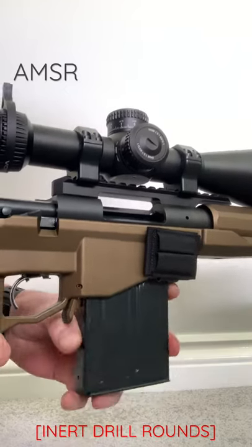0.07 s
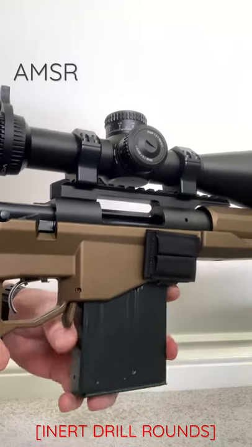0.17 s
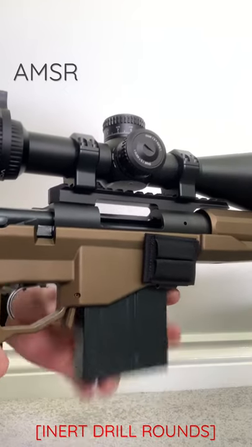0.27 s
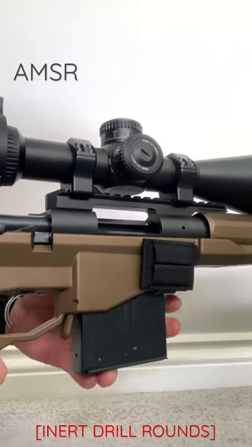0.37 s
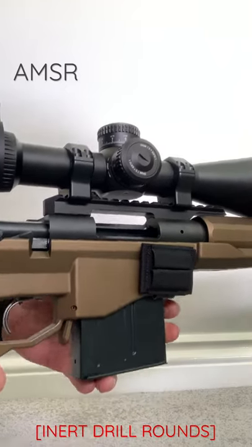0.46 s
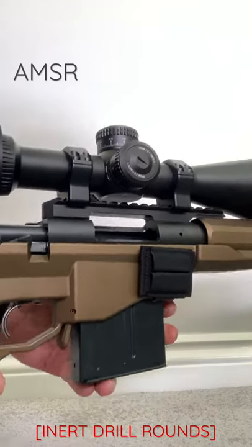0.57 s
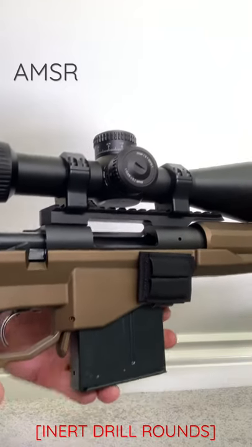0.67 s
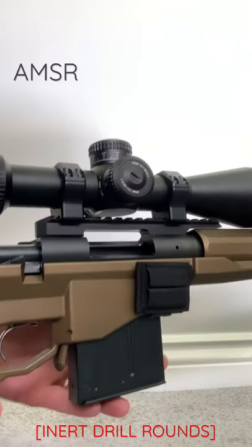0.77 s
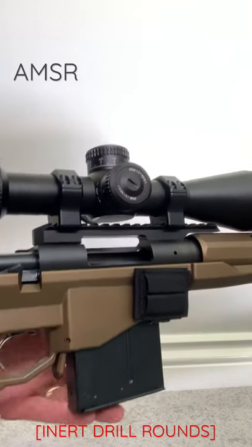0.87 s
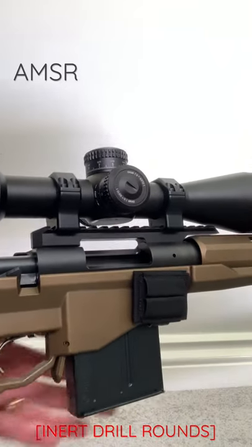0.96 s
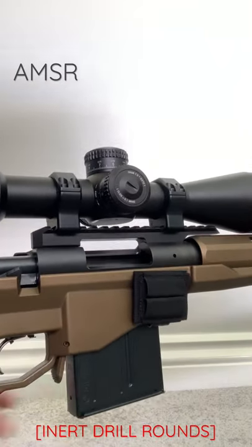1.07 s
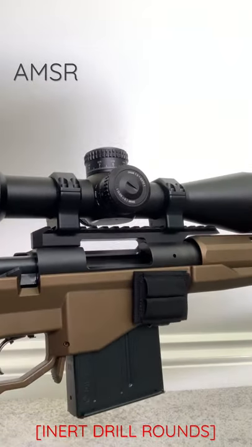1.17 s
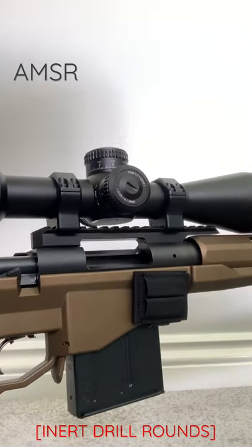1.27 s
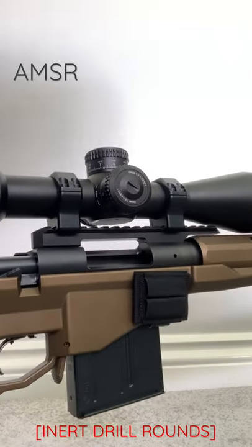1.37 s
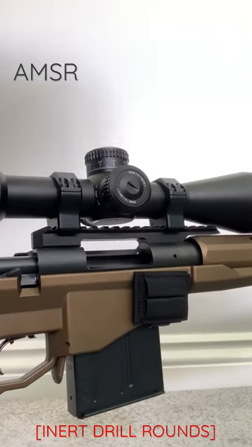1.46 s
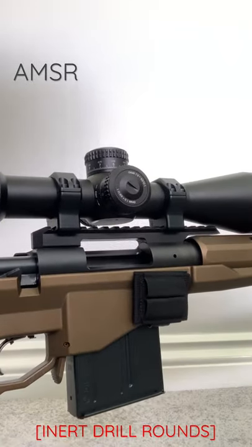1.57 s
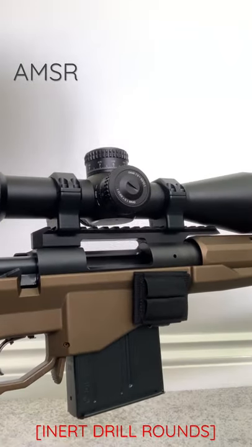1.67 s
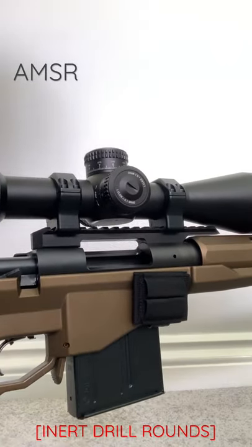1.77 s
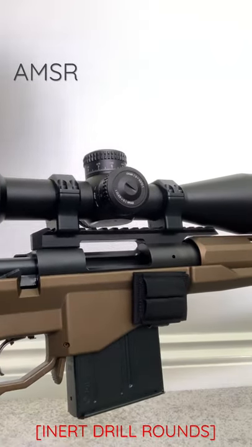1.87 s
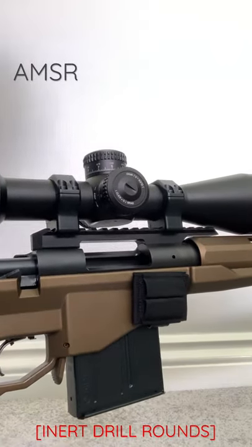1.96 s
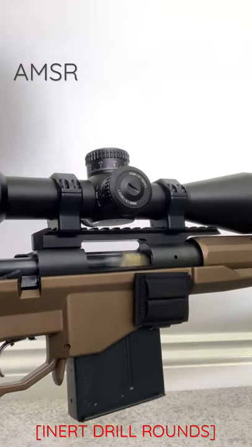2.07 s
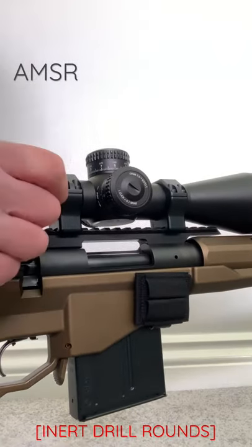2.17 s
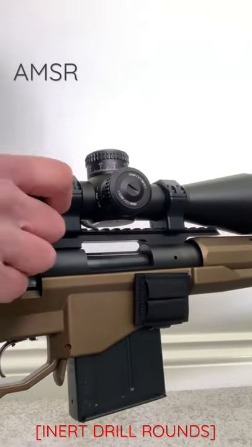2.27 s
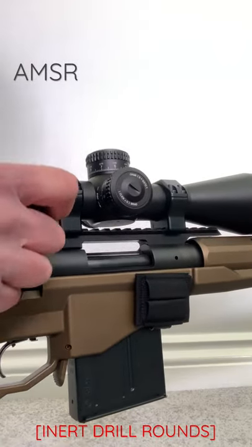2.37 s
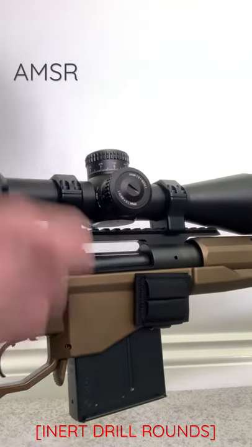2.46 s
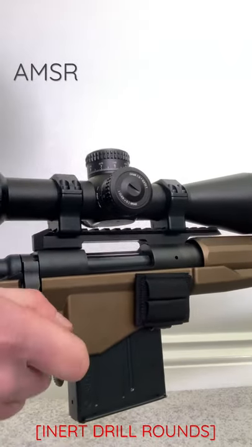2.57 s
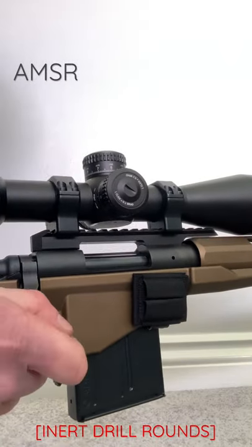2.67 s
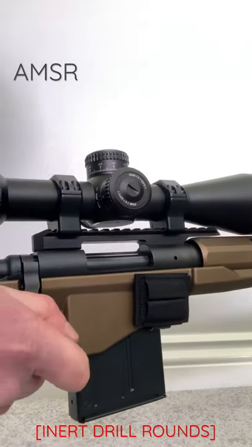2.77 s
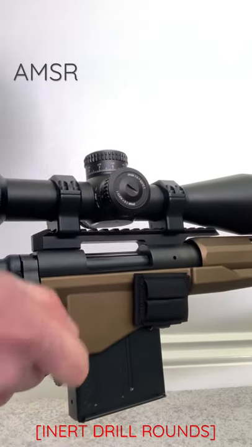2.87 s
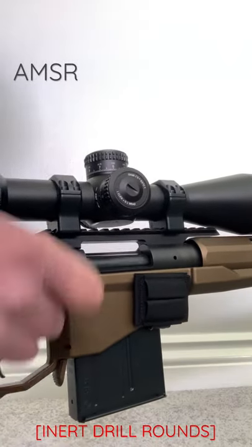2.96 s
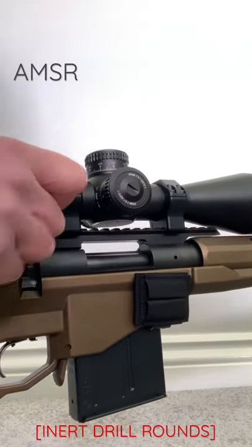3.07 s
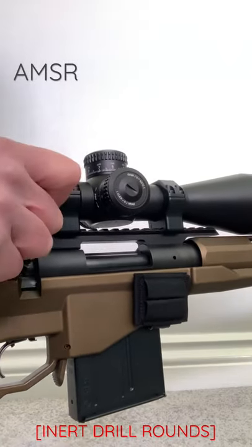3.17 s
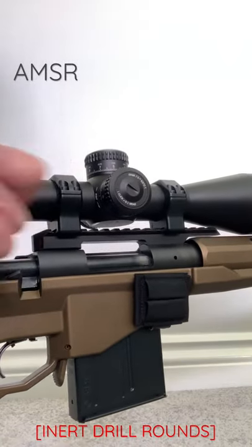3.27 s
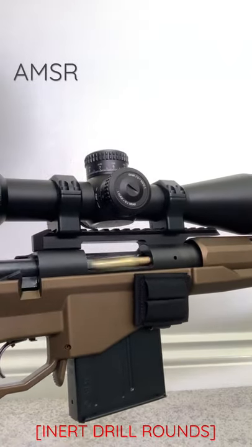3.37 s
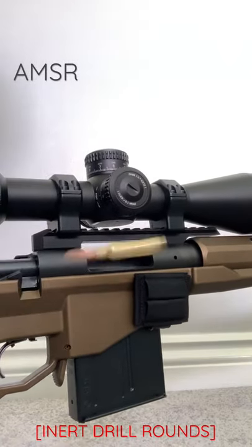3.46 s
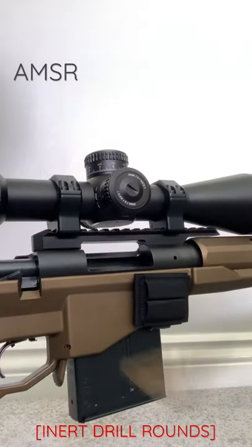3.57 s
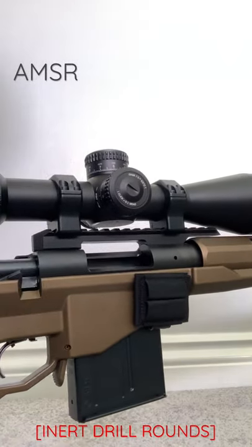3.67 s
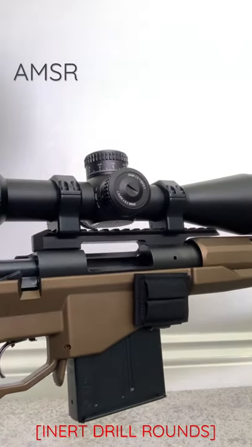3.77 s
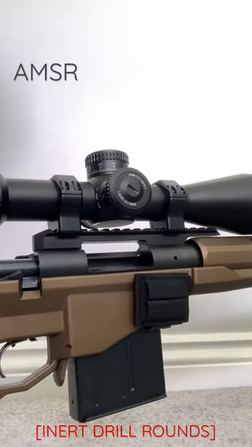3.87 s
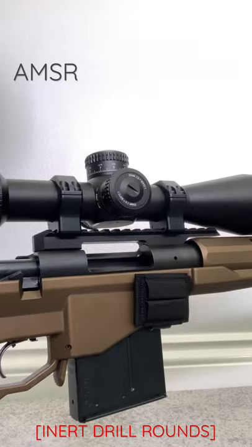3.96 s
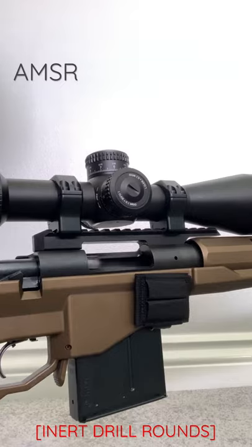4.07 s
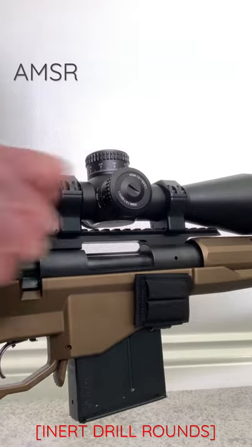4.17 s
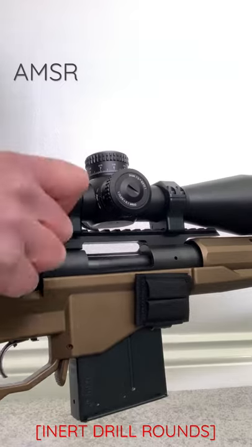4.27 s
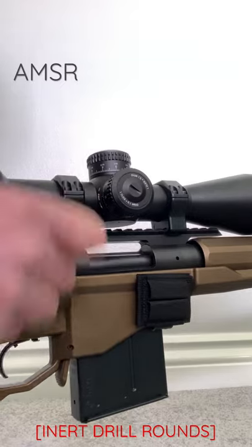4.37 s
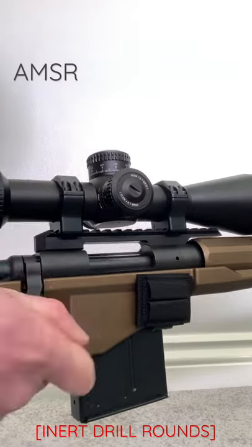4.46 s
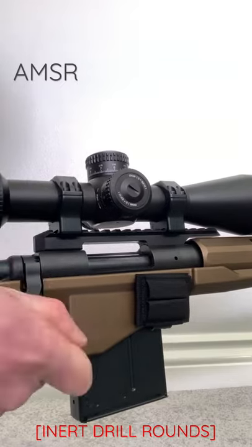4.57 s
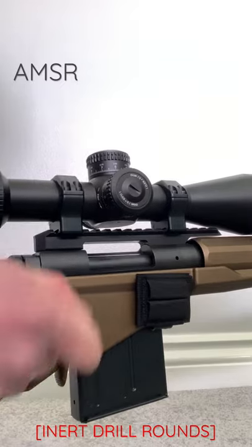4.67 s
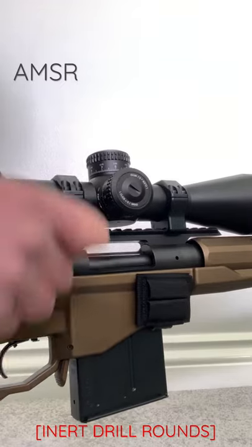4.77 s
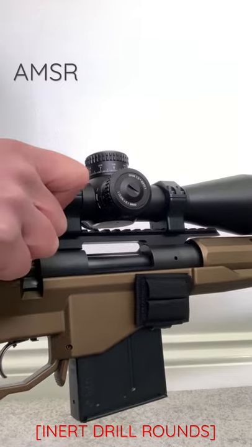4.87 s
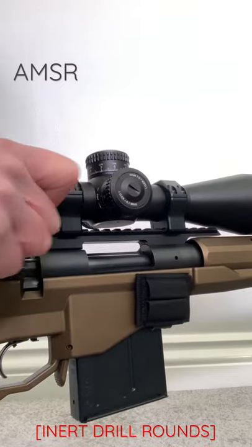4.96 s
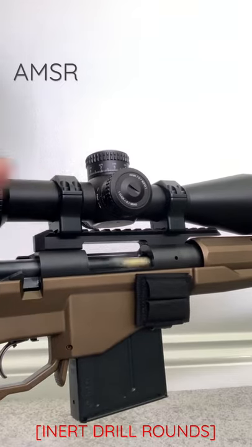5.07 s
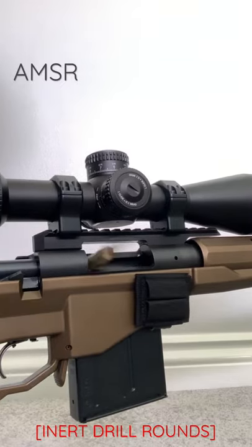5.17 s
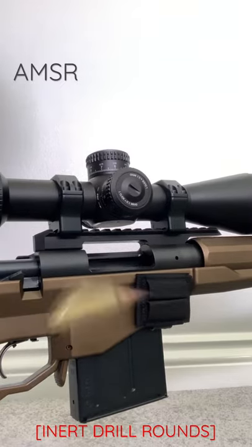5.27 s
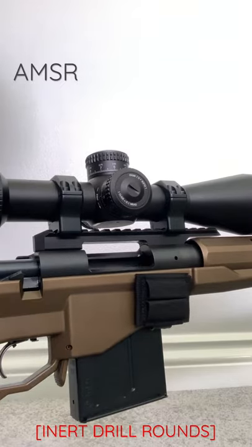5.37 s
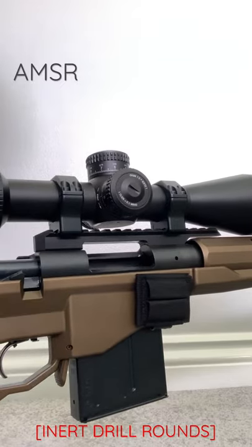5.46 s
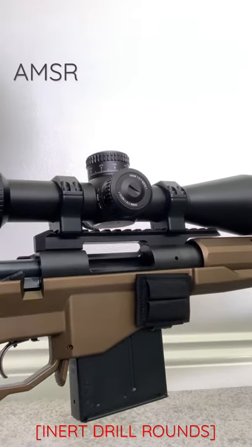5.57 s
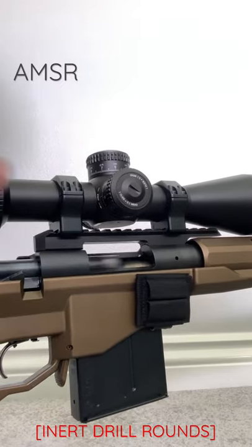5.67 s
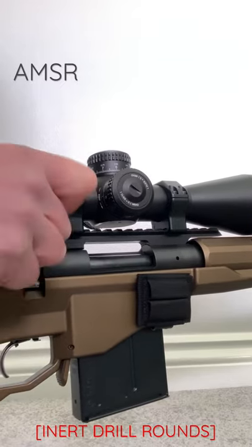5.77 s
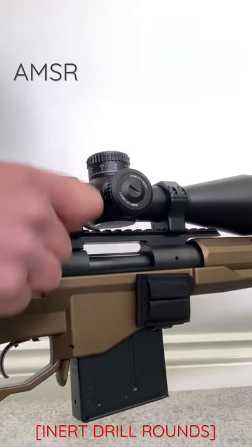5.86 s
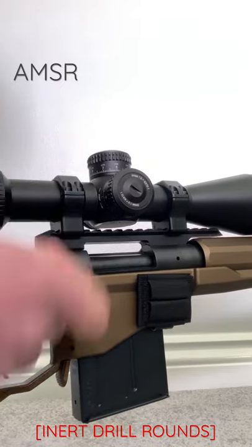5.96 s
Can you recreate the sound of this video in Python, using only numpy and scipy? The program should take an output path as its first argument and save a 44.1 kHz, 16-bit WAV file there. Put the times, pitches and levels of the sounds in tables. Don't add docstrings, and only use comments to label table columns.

```python
import sys
import numpy as np
from scipy import signal
from scipy.fft import rfft, irfft, next_fast_len
from scipy.io import wavfile
from scipy.ndimage import uniform_filter1d, minimum_filter1d

SR = 44100
rng = np.random.default_rng(int(sys.argv[2]) if len(sys.argv) > 2 else 0)


def inscribe(sig):
    pcm = np.round(np.clip(np.atleast_2d(sig).T, -1, 1) * 32767)
    wavfile.write(sys.argv[1], SR, pcm.astype(np.int16))


def volts_from_decibels(level):
    exponent = np.asarray(level, float) / 20
    return 10 ** exponent


N = 265923
LEAD_IN_MS = 15

# pitch_hz [Hz], t60_s [s to fall 60 dB]
ROOM_T60 = [(100, 0.42), (400, 0.25), (1200, 0.16), (2100, 0.54), (3200, 0.3), (5000, 0.28), (8000, 0.3),
            (11500, 0.23), (13500, 0.26), (15800, 0.24)]


def evened(x):
    return x / np.sqrt(np.mean(x ** 2) + 1e-20)


def read(points, hz):
    f, value = np.transpose(points)
    return np.interp(np.log(hz + 1), np.log(f + 1), value)


def add(mix, s, sound, peak_db):
    sound = sound[max(-round(s * SR), 0):]
    part = mix[max(round(s * SR), 0):][:len(sound)]
    part += volts_from_decibels(peak_db) * sound[:len(part)] / abs(sound).max()


def in_order(groups):
    return sorted((*row, shared) for rows, shared in groups for row in rows)


def coloured(x, gain):
    size = next_fast_len(N)
    return irfft(rfft(x, size) * gain(np.fft.rfftfreq(size, 1 / SR)), size)[..., :N]


def rings(modes, chance, seconds):
    hz, db, t60 = np.transpose(modes)[:, :, None]
    t = np.arange(round(seconds * SR)) / SR
    height, phase = chance[:, :len(hz), None]
    pitch = hz * (1 + .05 * (phase - .5))
    return volts_from_decibels(db + 8 * (height - .5) - 60 * t / t60) * np.sin(2 * np.pi * (pitch * t + phase))


def chatter(noise, ms, spiky):
    t = np.arange(len(noise)) / SR * 1000 - LEAD_IN_MS
    after = np.maximum(t, 0)
    blow = (1 - np.exp(-after / (0.6 * ms + 0.3))) * np.exp(-(after / max(ms, .3)) ** 1.9)
    swell = .008 * (ms + 1.5) * np.exp(-abs(t) / 4)
    return noise * abs(noise) ** spiky * (blow + swell)


def struck(hz, width_hz, seconds=.012):
    t = np.arange(round(seconds * SR)) / SR
    return np.sin(2 * np.pi * hz * t) * np.exp(-np.pi * width_hz * t)


def clicks():
    # pitch_hz [Hz], level_db [dB], t60_s [s]
    steel = [(1950, -4, .06), (3430, 0, .035), (13280, -4, .04)]
    # start_s [s], peak_db [dB], sizzle_db above 9.5 kHz [dB], chatter_ms [ms]
    handle = [(.2955,-10,-33,3.8),(.2992,-1.5,-23,2.4),(5.048,-36,-22,1.5),(1.8765,-60,-28,3.6),(2.0019,-20,-15.5,5.4),(2.3321,-40,-40,14.2),(2.9205,-34.5,-15,0.43),(3.4285,-9.5,-2,1.35),(3.6461,-51,0,3.9),(4.0028,-38.5,-17,10),(4.8285,-12,-14.5,2.3),(5.477,-38.5,-10,4.2),(5.8855,-39,-39,20)]
    bolt = [(.284,-28,-0.5,1.6),(.3035,-10,-14,2.24),(2.0555,-10,-16.5,3),(2.0695,-14.5,4.5,2.65),(2.074,-9.5,-25,8.2),(2.079,-17,2.5,4.4),(2.085,-23.5,-2,3.4),(2.4676,-15,-6.5,9.3),(2.4724,-14.5,-15.5,2.8),(2.5566,-33.5,-23,17),(3.025,-21.5,-10.5,1.9),(3.0425,-14.5,-21.5,4.6),(3.3231,-21,-21.5,11.4),(3.3775,-20,-17.5,6.1),(3.4215,-14,-15.5,5.2),(3.8694,-24.5,-22.5,6.2),(4.1178,-9,-11,2.9),(4.3671,-22,-4,2.6),(4.4712,-18,-11,6.8),(4.6563,-42.5,-16,1.4),(4.6787,-35,-51,7.2),(4.7965,-16.5,-24,1.8),(4.8012,-21.5,-25.5,2.3),(4.8185,-24.5,-12,3.6),(5.1642,-11.5,-4,2.7),(5.168,-17.5,6,2.3),(5.6685,-28,-27,3.8),(5.6828,-9,1.5,2.6),(5.69,-8,0,7.8),(5.6965,-27.5,-5,8.2),(5.7025,-11,-6.5,13.8)]
    lugs = [(.0054,-24.5,-5,3.1),(.0563,-33.5,-30,3.65),(1.782,-6.5,-12.5,2.04),(2.1612,-17,-2.5,3.8),(2.2313,-28,-30,3.1),(3.0676,-8.5,-5.5,5.7),(3.7941,-12.5,-16,2.07),(4.0995,-21,-26,3.4),(4.104,-12,-8,1.7),(4.109,-13,-29,0.98),(4.1245,-8.5,-5,3.9),(4.143,-26,-13,1.5),(4.823,-6,-3.5,1.5),(4.1983,-14,-14,1.6),(4.3447,-33.5,-39.5,4.4),(4.6971,-21,-32.5,0.82),(1.0095,-32,-21,1.5),(5.0635,-16,-14.5,2.4),(5.0765,-21,-23,2.6),(5.125,-18,-26,7.5),(5.1445,-12.5,-17.5,4.6),(5.157,-18,-8.5,4.4),(5.39,-50,-4,6.2),(5.4166,-15.5,-11.5,1.7),(5.6745,-11,-14,3.1)]
    claw = [(3.306,-11.5,-12.5,3.7),(3.368,-15.5,2.5,3.8),(3.376,-6,-9,0.64),(3.4145,-39,-5,2.3),(3.4335,-10,-2.5,1.6),(4.1215,-17.5,8.5,1.6),(4.8155,-30,-6.5,2.7),(5.1164,-17,7.5,0.56),(5.123,-17,-2,3.6),(4.3764,-18.5,-11.5,3.7),(5.7651,-14,-14,3.1),(5.9195,-21,-5,3.1)]
    blows = in_order([(handle, 2850), (bolt, 3450), (lugs, 4500), (claw, 7100)])
    out = np.zeros(N)
    noise = rng.standard_normal((len(blows), 2, 2000))
    chance = rng.random((len(blows), 2, 20))
    mid = signal.butter(2, [1800, 9500], "band", fs=SR)
    top = signal.butter(3, 9500, "high", fs=SR)
    t = np.arange(SR // 10) / SR
    blur = rng.standard_normal((len(blows), len(t))) * volts_from_decibels(-14 - 60 * t / 0.015)
    for (s, db, sizzle_db, ms, hz), (a, b), c, body in zip(blows, noise, chance, blur):
        s = s - .001 - LEAD_IN_MS / 1000
        body = body + volts_from_decibels(-33) * rings(steel, c, .1).sum(0)
        body[0] += 1.1
        part = body + 0.62 * struck(hz, 1100, .1)
        click = signal.fftconvolve(chatter(a, ms, 0.16), part)
        add(out, s, signal.lfilter(*mid, click), db + 0.5)
        tip = body + 0.1 * struck(10000, 900, .1)
        sizzle = signal.fftconvolve(chatter(b, ms, 1.0), tip)
        add(out, s, signal.lfilter(*top, sizzle), db + sizzle_db + 14.5)
    return out


def knocks():
    # pitch_hz [Hz], level_db [dB], t60_s [s]
    stock = [(535, -6.5, 0.073), (749, -2.5, 0.05), (870, 5.5, 0.0066), (1093, 6.5, 0.0077),
             (1296, 2, 0.052), (1530, -23, 0.022), (1644, -2, 0.026)]
    # start_s [s], peak_db [dB]
    butt = [(1.877,-28.5),(1.945,-43),(2.016,-14),(2.557,-28),(2.921,-30),(3.068,-11.5),(3.645,-37.5),(3.795,-26.5),(4.006,-25.5)]
    grip = [(.057,-36.5),(2.867,-36.5),(3.434,-6.5),(3.437,-36.5),(4.828,-17.5)]
    cheek = [(.181,-39.5),(4.366,-19),(4.679,-26.5),(5.682,-4.5),(5.688,-4.5),(5.694,-14.5),(5.702,-15),(5.765,-12)]
    forend = [(2.072,-11.5),(4.153,-48),(4.472,-13.5),(4.642,-34),(4.959,-45),(4.988,-41.5),(5.147,-9.5),(5.153,-15),(5.158,-13.5),(5.166,-8),(5.172,-11.5),(5.476,-24.5),(5.699,-7.5),(5.89,-28),(5.92,-37.5),(5.953,-38),(5.966,-40),(5.976,-36.5),(5.993,-37.5),(6.007,-43),(6.018,-36)]
    well = [(2.077,-5),(2.335,-36),(2.972,-33.5),(3.044,-18),(3.321,-18),(3.871,-22),(4.047,-30.5),(4.117,-5),(4.124,-5)]
    flank = [(2.162,-26.5),(2.47,-13.5),(3.025,-18.5),(3.369,-16),(4.099,-18),(4.2,-18.5),(4.406,-29.5),(4.425,-29),(4.698,-20.5),(4.796,-19.5),(5.061,-26.5),(5.075,-18.5),(5.117,-23),(5.13,-15),(5.138,-22),(3.235,-35.5),(3.262,-32.5),(3.283,-44),(3.395,-29.5),(5.6,-37),(5.625,-37.5),(5.417,-28.5),(5.583,-37),(5.652,-22.5)]
    rail = [(.005,-19.5),(.296,-12),(1.782,-23.5),(2.005,-14.5),(2.116,-54),(2.224,-44.5),(3.306,-20.5),(4.342,-28.5),(5.038,-32.5),(5.121,-19.5)]
    latch = [(1.01,-43),(1.033,-45),(1.062,-54),(1.41,-47),(1.435,-39.5),(1.63,-53),(1.085,-50),(1.115,-54.5),(2.008,-27),(2.03,-16),(2.056,-16)]
    blows = in_order([(butt, 530), (grip, 700), (cheek, 885), (forend, 1000),
                      (well, 1110), (flank, 1265), (rail, 1500), (latch, 1600)])
    out = np.zeros(N)
    noise = rng.standard_normal((len(blows), 2000))
    chance = rng.random((len(blows), 2, 20))
    for (s, db, hz), a, c in zip(blows, noise, chance):
        body = volts_from_decibels(-19) * rings(stock, c, 0.11).sum(0)
        panel = struck(hz, 125, .04)
        body[:len(panel)] += panel
        knock = signal.fftconvolve(chatter(a, 5.47, 0.18), body)
        add(out, s - .001 - LEAD_IN_MS / 1000, knock, db + 0.5)
    return out


def patchy(x):
    z = signal.stft(x, nperseg=256)[2]
    patches = uniform_filter1d(rng.standard_normal(z.shape), size=3, axis=0)
    patches = uniform_filter1d(patches, size=5, axis=1)
    swing_db = 5 * evened(patches)
    return evened(signal.istft(z * volts_from_decibels(swing_db), nperseg=256)[1][:N])


def slides():
    # peak_s [s], level_db [dB rms], rise_ms [ms], fade_ms [ms]
    rubs = [(.01,-40.5,12,39),(.32,-48,5.5,23),(.55,-60.5,280,34.5),(.75,-75,18,15.6),(.88,-61.5,51,70),(1.2,-80,42,29),(1.53,-82,8.6,34),(1.635,-61,14,12),(1.049,-47.5,23.2,26),(1.42,-55.5,23,20),(1.69,-66.5,176,66),(1.997,-36,8.9,69),(2.33,-59,11,48),(3.01,-54.5,43,27),(3.055,-31,7.4,28),(3.27,-42,23,40.5),(3.406,-26,19,19),(4.095,-36.5,21,8),(4.75,-50,11,32),(5.047,-36,15.5,19.8),(5.137,-28,10,15),(5.601,-57,17,62),(5.97,-51,490,19),(3.24,-50.5,27,22),(4.42,-46.5,26,31),(4.97,-52.5,15,30),(5.9,-46,8,14),(6.0,-52,29,18),(1.09,-70.5,18,27)]
    # peak_s [s], level_db [dB rms], rise_ms [ms], fade_ms [ms]
    glides = [(.19,-55.5,20,36),(.27,-31.5,11,31),(.294,-27.5,10,2.8),(1.3,-59,20,45),(2.11,-36,37,15),(2.89,-59,4.8,42),(3.34,-43.5,9.1,20),(3.89,-40,10,14),(4.04,-47,24,7.4),(4.15,-34,7.5,7.7),(4.39,-53.5,62,31),(4.81,-23.5,12,22),(4.98,-53,13,98),(5.666,-35,8,14),(5.73,-36,33,21)]
    # pitch_hz [Hz], level_db [dB]
    rub_dull = [(200, -4.5), (600, 2), (1100, 5), (1750, 6), (2300, -6), (4000, -18), (8000, -22),
                (13000, -24.5)]
    # pitch_hz [Hz], level_db [dB]
    rub_bright = [(200, -20.5), (600, -12.5), (1300, 2.5), (2200, 4.5), (4000, 8), (8000, -1.5), (13000, 6)]
    t, dull_level, bright_level = np.arange(N) / SR, np.zeros(N), np.zeros(N)
    for s, db, rise_ms, fade_ms, share in in_order([(rubs, 0.32), (glides, 0.46)]):
        near = slice(max(round((s - .25) * SR), 0), round((s + .35) * SR))
        ms = (t[near] - s) * 1000
        pace_ms = np.where(ms < 0, rise_ms, fade_ms)
        stroke = volts_from_decibels(db) * np.exp(-(ms / pace_ms) ** 2 / (1 + abs(ms) / 40))
        dull_level[near] += stroke * np.sqrt(1 - share)
        bright_level[near] += stroke * np.sqrt(share)
    unevenness_db = 2.6 * evened(uniform_filter1d(rng.standard_normal((2, N)), 160))
    slips = rng.standard_normal((2, N)) * volts_from_decibels(unevenness_db)
    dull = patchy(coloured(slips[0], lambda hz: volts_from_decibels(read(rub_dull, hz))))
    bright = evened(coloured(slips[1], lambda hz: volts_from_decibels(read(rub_bright, hz))))
    return dull_level * dull + bright_level * bright


def air():
    # pitch_hz [Hz], level_db [dB per Hz]
    air_colour = [(24, -28.5), (40, -1.5), (140, -5), (297, -11), (680, -28), (1140, -30.5), (4000, -52),
                  (5200, -88.5)]
    # time_s [s], level_db [dB]
    air_level = [(0,-63.5),(.65,-65),(.8,-56.5),(1,-54.5),(1.25,-67),(1.432,-50),(1.61,-56.5),(1.71,-41.5),(1.901,-49.5),(2.6,-52),(2.779,-80),(2.901,-52),(4,-46),(4.599,-55),(5.299,-57.5),(5.55,-46.5),(6.03,-53)]
    lumps_db = 4 * evened(uniform_filter1d(rng.standard_normal(N), 2500))
    level_db = np.interp(np.arange(N) / SR, *np.transpose(air_level))
    noise = coloured(rng.standard_normal((2, N)), lambda hz: volts_from_decibels(read(air_colour, hz)))
    return volts_from_decibels(level_db + lumps_db) * evened(noise)


def diffuse(x):
    # pitch_hz [Hz], width_hz [Hz], share of added t60 [0-1]
    linger = [(1330, 130, 0.34), (1890, 80, 0.38), (3500, 180, 0.34), (4660, 250, 0.22), (6770, 250, .2),
              (13300, 400, .5)]
    hz, t, z = signal.stft(x, SR, nperseg=256)
    singing = sum(share * np.exp(-((hz - at_hz) / width_hz) ** 2) for at_hz, width_hz, share in linger)
    t60 = read(ROOM_T60, hz) * (0.71 + singing)
    power = uniform_filter1d(abs(z) ** 2, size=3, axis=0)
    keep = volts_from_decibels(-120 * t[1] / t60)
    lingering = np.array([signal.lfilter([0, 1 - k], [1, -k], p) for k, p in zip(keep, power)])
    a, b = rng.standard_normal((2, 2, *z.shape))
    return signal.istft(np.sqrt(abs(lingering)) * (a + 1j * b), SR, nperseg=256)[1][:, :N]


def scatter(x):
    paths = rng.standard_normal((3, 1200)) * np.exp(-np.arange(1200) / 220)
    cycles = 2.3 * np.arange(N) / SR + np.arange(3)[:, None] / 3
    turn = np.cos(2 * np.pi * cycles) * np.sqrt(2 / 3)
    return signal.oaconvolve(x * turn, paths / np.linalg.norm(paths[0]), axes=1)[:, :N].sum(0)


def thuds():
    # pitch_hz [Hz], level_db [dB], t60_s [s]
    floor_rings = [(56.5,-4.5,0.07),(79,-8.5,0.18),(120,-5,0.13),(162.1,-0.5,0.17),(245,-14,0.07),(333,-16,0.07),(426.4,-13,0.06)]
    # start_s [s], peak_db [dB], swing_hz [Hz], boom_db [dB]
    rest = [(1.872,-33,295,-3.5),(2.011,-20,260,-4.5),(2.069,-23,312,-19.5),(2.465,-20.5,243,-4.5),(3.07,-21.5,454,0.5),(3.368,-21,456,-8),(3.431,-17.5,483,-13),(4.113,-35.5,350,-0.5),(4.361,-30,220,0),(4.822,-17,365,-3.5),(5.386,-22,423,1.5),(5.632,-27.5,172,3),(5.907,-37,252,3)]
    # start_s [s], peak_db [dB], swing_hz [Hz], boom_db [dB]
    boards = [(.294,-47,239,-11),(1.675,-42,240,-7),(1.71,-48.5,220,-2.5),(1.73,-53,200,-2.5),(.745,-53,293,-9.5),(.93,-52,197,-0.5),(1.796,-37.5,265,-5),(2.87,-43,273,4),(3.294,-35.5,312,4),(3.644,-10.5,360,-4),(3.885,-21.5,245,0.5),(4.016,-31,202,-1.5),(4.477,-20.5,510,0.5),(5.048,-35.5,293,1.5),(5.157,-24.5,258,-5)]
    jolts = in_order([(rest, 165), (boards, 82)])
    out = np.zeros(N)
    chance = rng.random((len(jolts), 2, 20))
    noise = rng.standard_normal((len(jolts), 40))
    t = np.arange(SR // 2) / SR
    barrel = struck(286, 4.5, .5) * signal.windows.tukey(len(t), .15)
    for (s, db, hz, boom_db, boom_hz), c, bumps in zip(jolts, chance, noise):
        swing = struck(hz, 78, 0.035)
        add(out, s, swing * (1 - np.exp(-(np.arange(len(swing)) / 150) ** 2)), db)
        shaking = np.zeros(4000)
        shaking[::100] = bumps * np.exp(-np.arange(len(bumps)) / 3.5)
        this_boom_hz = boom_hz * (1 + 0.16 * (c[0, -1] - .5))
        boom = volts_from_decibels(-11.5) * rings(floor_rings, c, .5).sum(0) + struck(this_boom_hz, 30, .5)
        add(out, s, signal.fftconvolve(boom * (1 - np.exp(-t / 0.03)), shaking), db + boom_db)
        add(out, s, barrel, -31 + 0.33 * db - 20 * (s < 1))
    return out


def room(x):
    hz, t, z = signal.stft(rng.standard_normal((2, SR // 2)), SR, nperseg=256)
    tail = signal.istft(z * volts_from_decibels(-60 * t / read(ROOM_T60, hz)[:, None]), SR, nperseg=256)[1]
    tail *= np.clip(np.arange(tail.shape[1]) / SR / 0.00027 - .3, 0, 1)
    return signal.fftconvolve(x[None], tail / np.linalg.norm(tail[0]), axes=1)[:, :N]


def beating_rings():
    # start_s [s], pitch_hz [Hz], beat_hz between the pair [Hz],
    # flight_s until damped [s]
    paired_rings = [(3.43,10490,14,.22),(3.43,13250,160,.15),(5.16,10620,12,.23),(5.16,13200,11,.17),(.4,648,1,.23),(1.782,4480,70,.15),(.305,1930,37,.2),(3.615,10480,30,.04),(3.435,11850,60,.03),(3.435,14950,45,.07),(5.69,10500,90,.04),(1.02,1780,40,.1),(1.4,1700,55,.06)]
    # level_db [dB], t60_s [s]
    ring_levels = [(-21.5,0.31),(-30,0.08),(-22,.36),(-33,0.18),(-65,7.6),(-51.5,0.43),(-38,.35),(-40,0.091),(-46.5,0.2),(-36,.2),(-21,0.18),(-58,0.54),(-55.5,.6)]
    out, t = np.zeros(N), np.arange(SR // 2) / SR
    drift = uniform_filter1d(rng.standard_normal((len(paired_rings), 2, len(t))), size=350)
    drift = uniform_filter1d(drift, size=200)
    for (s, hz, beat_hz, flight_s), (db, t60), (sway, flutter) in zip(paired_rings, ring_levels, drift):
        turns = hz * np.cumsum(1 + .0045 * evened(sway)) / SR
        pair = np.sin(2 * np.pi * turns) - .8 * np.sin(2 * np.pi * (turns + beat_hz * t) + 4.4)
        landing_db = -20 * np.clip((t - flight_s + .03) / .12, 0, 1)
        flutter_db = 5 * min(hz / 9000, 1) * np.tanh(evened(flutter))
        onset = np.minimum(t * hz / 40, 1)
        add(out, s, pair * volts_from_decibels(landing_db + flutter_db - 60 * t / t60) * onset, db)
    return out


def drop_weak_sum(x):
    gap_low_hz, gap_high_hz, gap_db = 8400, 11400, -7
    quiet_hz, quiet_db = 8000, -29
    sudden_db = 15
    hz, t, z = signal.stft([x[0] + x[1], x[0] - x[1]], SR, nperseg=512)
    power = uniform_filter1d(abs(z) ** 2, size=5, axis=1)
    valley = uniform_filter1d(minimum_filter1d(power[0], size=15, axis=0), size=9, axis=0)
    tone = power[0] > 15 * valley
    whole = power.sum((0, 1))
    sudden = whole > volts_from_decibels(2 * sudden_db) * np.roll(whole, shift=2)
    strong = (power[0] > volts_from_decibels(2 * gap_db) * power[1]) | tone
    strong = strong & (power[0] > volts_from_decibels(2 * -70)) | sudden
    z[0] *= strong | ((hz < gap_low_hz) | (hz > gap_high_hz))[:, None]
    strongest = power[:, hz > quiet_hz].max((0, 1))
    loud_enough = uniform_filter1d(power, size=12, axis=1) > volts_from_decibels(2 * quiet_db) * strongest
    z *= tone | loud_enough | (hz < quiet_hz)[:, None]
    both, apart = signal.istft(z, SR, nperseg=512)[1][:, :N]
    return np.array([both + apart, both - apart]) / 2


def scene():
    near, ringing = clicks() + knocks() + slides(), beating_rings()
    low = thuds()
    boom = room(low)
    wet = volts_from_decibels(-11.5) * diffuse(near) + volts_from_decibels(-9.5) * boom + air()
    scattered = scatter(near) + 3.1 * ringing + volts_from_decibels(-12) * boom[1]
    return np.array([near + ringing + low + wet[0], scattered + wet[1]])


def top_cut(x):
    return signal.sosfilt(signal.butter(12, 16980, fs=SR, output="sos"), x)


def record(dry):
    # pitch_hz [Hz], lead_rad [radians]
    lead = [(300,.3),(800,.9),(2240,2),(3360,.3),(6290,1.1),(8440,2.9),(10900,3.5),(14200,6.1)]
    # pitch_hz [Hz], likeness [0-1]
    same = [(60,.86),(200,0.62),(500,0.35),(900,0.76),(2800,0.57),(4000,0.5),(10000,0.96),(15000,.92)]
    # pitch_hz [Hz], loss_db [dB]
    tilt = [(150,.5),(900,1),(5000,0.05)]
    # pitch_hz [Hz], level_db [dB]
    overall_colour = [(25, -21.5), (45, -5.5), (2500, 1), (5500, 3), (13000, -3), (15900, -12.5), (16200, -29.5),
                      (17000, -36)]
    right = coloured(dry[0], lambda hz: np.minimum(read(same, hz), 1) * np.exp(1j * read(lead, hz)))
    right += coloured(dry[1], lambda hz: np.sqrt(1 - np.minimum(read(same, hz), 1) ** 2))
    ports = np.array([dry[0], coloured(right, lambda hz: volts_from_decibels(-read(tilt, hz)))])
    heard = np.clip(coloured(ports, lambda hz: volts_from_decibels(read(overall_colour, hz))), -1, 1)
    return top_cut(drop_weak_sum(heard))


dry = scene()
out = record(dry)
inscribe(out)
```